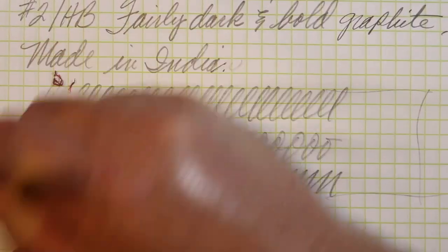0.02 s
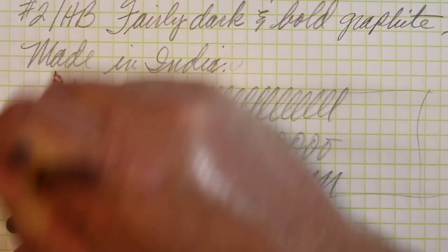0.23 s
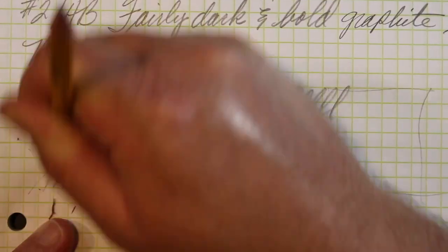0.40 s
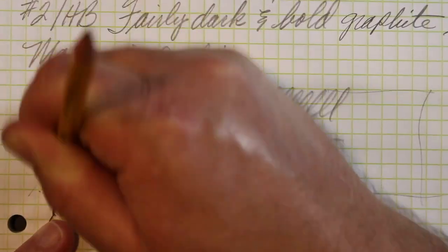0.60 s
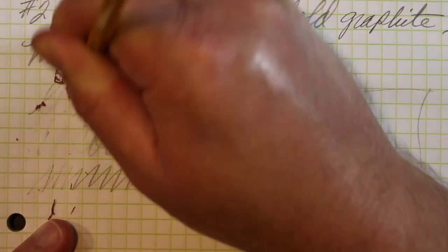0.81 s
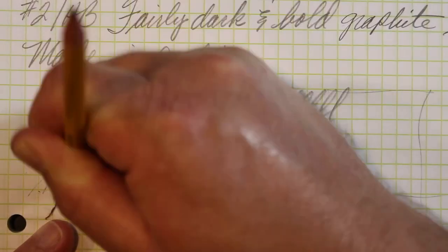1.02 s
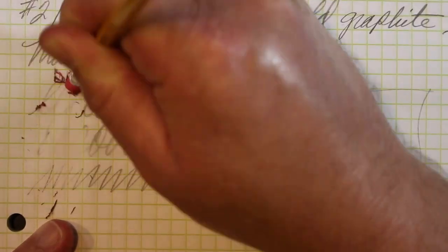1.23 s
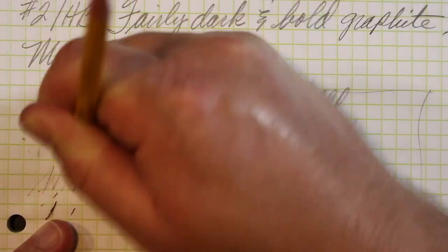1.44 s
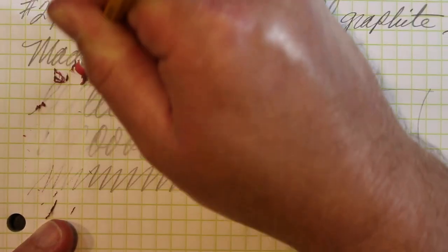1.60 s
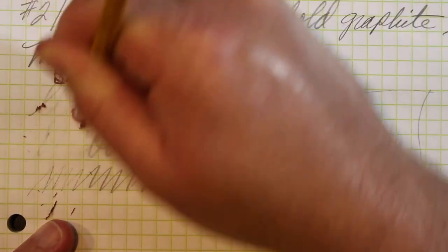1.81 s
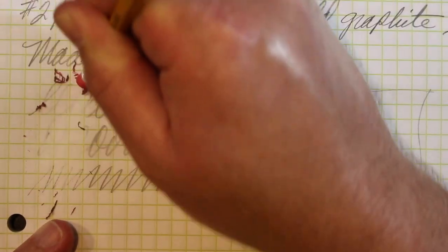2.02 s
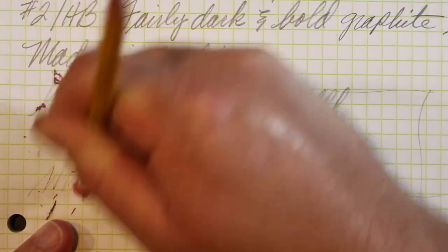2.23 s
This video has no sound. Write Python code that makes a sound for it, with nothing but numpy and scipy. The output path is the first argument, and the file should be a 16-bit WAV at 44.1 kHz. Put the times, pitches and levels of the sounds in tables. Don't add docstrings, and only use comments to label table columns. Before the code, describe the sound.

A rubber eraser on a pencil rubs paper on a wooden desk in short, dry, separate swipes; two hard bumps early rattle loose objects, then softer thumps and ticks follow. Close stereo microphone, quiet humming room.

```python
import sys
import numpy as np
from scipy import signal
from scipy.io import wavfile

SR = 44100
rng = np.random.default_rng(int(sys.argv[2]) if len(sys.argv) > 2 else 0)


def to_linear_factor(level_db):
    exponent = np.asarray(level_db, float) / 20
    return 10 ** exponent


def materialize(psi):
    bounded = np.clip(np.atleast_2d(psi).T, -1, 1)
    quanta = np.round(bounded * 32767).astype(np.int16)
    wavfile.write(sys.argv[1], SR, quanta)


N = 101430
T = np.arange(N) / SR

# pitch in Hz, likeness (1 = the same).
LIKENESS = [(60, 0.92), (250, 1), (700, 0.91), (2500, 0.8), (8000, 0.79), (15000, 0.62)]


def rms_one(x):
    return x / np.sqrt(np.mean(x ** 2) + 1e-20)


def at_hz(points, hz):
    table = np.array(points)
    return np.interp(np.log(hz), np.log(table[:, 0]), table[:, 1])


def filtered(x, order, hz, kind="low"):
    return signal.sosfilt(signal.butter(order, hz, kind, fs=SR, output="sos"), x)


def right_louder(db):
    return to_linear_factor(np.array([[-1], [1]]) * db)


def drift(rate):
    r = np.exp(-2 * np.pi * rate * 40 / SR)
    noise = rng.standard_normal(N // 40 + 2002)
    slow = signal.lfilter([1], [1, -2 * r, r * r], noise)[2000:]
    return np.interp(np.arange(N) / 40, np.arange(len(slow)), rms_one(slow))


def ring(x, hz, t60):
    r = to_linear_factor(-60 / (t60 * SR))
    w = 2 * np.pi * hz / SR
    return signal.lfilter([0, np.sin(w)], [1, -2 * r * np.cos(w), r * r], x + 1e-18)


def slips(rate, spread_db):
    sizes = to_linear_factor(spread_db * np.minimum(rng.exponential(1, (2, 2, N)), 5))
    sizes = sizes * rng.choice([-1, 1], (2, 2, N))
    happens = rng.random((2, 2, N)) < rate / SR
    return rms_one(sizes * happens)


def banded(white, spectrum, patchy_db, shape, likeness, rate=12):
    out, power = 0, 0
    edges = 20 * 2 ** np.arange(0, 10.1, 1 / 3)
    for k, (low, high) in enumerate(zip(edges, edges[1:])):
        hz = np.sqrt(low * high)
        if spectrum[0][0] / 1.3 < hz < spectrum[-1][0] * 1.3:
            mid, side = filtered(white[k % 2], 2, [low, high], "band")
            alike = np.clip(at_hz(likeness, hz), -1, 1)
            gain = to_linear_factor(at_hz(spectrum, hz))
            power += gain ** 2 * (high - low) * 2 / SR
            stereo = np.sqrt(1 + alike) * mid + np.sqrt(1 - alike) * side * [[1], [-1]]
            out = out + gain * to_linear_factor(patchy_db * drift(rate)) * shape(hz) * stereo / np.sqrt(2)
    return out / np.sqrt(power)


def chatter(s, length, count):
    x = np.zeros(N)
    draw = rng.random((count, 3))
    later = np.arange(count) > 0
    when = s + length * np.arange(count) / count + 0.001908 * draw[:, 0] * later
    weak = (0.056 + 0.15 * draw[:, 1]) * np.sign(draw[:, 2] - .5)
    x[np.clip((when * SR).astype(int), 0, N - 1)] = np.where(later, weak, 1)
    return x


def air():
    # pitch in Hz, level in dB per Hz.
    air_spectrum = [(12, -39), (20, -10.5), (214, -1.5), (441, -6.5), (535, -8.5), (3010, -15), (5110, -19),
                    (10800, -26), (15600, -33)]
    # pitch in Hz, likeness.
    air_likeness = [(40, 0.97), (250, 0.26), (1000, 0.067), (15000, 0.05)]
    white = rng.standard_normal((2, 2, N))
    return to_linear_factor(-52.5) * banded(white, air_spectrum, 1.2, lambda hz: 1, air_likeness)


def arm():
    # pitch in Hz, level in dB per Hz.
    arm_spectrum = [(30, -15), (60, -18), (110, -10), (170, -6)]
    white = rng.standard_normal((2, 2, N))
    return to_linear_factor(-68) * banded(white, arm_spectrum, 3.4, lambda hz: 1, LIKENESS, rate=3.5)


def room(x):
    t60_s, wall_cut_hz = 0.42, 5100
    out = np.zeros((2, N))
    dull = np.exp(-2 * np.pi * wall_cut_hz / SR)
    lags = (rng.uniform(.012, .035, 12) * SR).astype(int)
    for k, lag in enumerate(lags):
        loop, state = x.copy(), [0.]
        gain = to_linear_factor(-60 * lag / SR / t60_s)
        for i in range(lag, N, lag):
            back, state = signal.lfilter([gain * (1 - dull)], [1, -dull], loop[i - lag:i], zi=state)
            loop[i:i + lag] += back[:N - i]
        out[k % 2] += (loop - x) * (-1) ** (k // 2)
    return out


def ticks():
    # start in seconds, peak level in dB, pitch in Hz, time to fade by 60 dB in seconds.
    tick_list = [(.142, -40, 5600, 0.029), (.322, -37, 750, 0.036), (.332, -50, 2530, .06),
                 (.417, -48, 1780, 0.023), (.433, -29, 700, .018), (.711, -35, 1695, .015),
                 (.746, -27, 762, 0.0075), (.748, -54, 1378, 1), (.787, -40, 2260, .04),
                 (.788, -44, 1400, .025), (.989, -46, 1510, 0.029), (1.002, -36, 740, 0.037),
                 (1.173, -47, 990, 0.022), (1.192, -42.5, 1300, 0.035), (1.205, -50, 577, 0.24),
                 (1.417, -54, 660, 0.012), (1.462, -34, 600, 0.042), (1.558, -43.5, 1440, 0.012),
                 (1.582, -44, 3640, .02), (1.775, -42, 611, 0.038), (1.936, -48, 583, 0.14),
                 (2.143, -57, 520, 0.049), (2.169, -32, 650, 0.015), (2.228, -36.5, 486, 0.063)]
    out = np.zeros(N)
    for s, db, hz, t60 in tick_list:
        age = np.maximum(T - s, 0)
        main = np.sin(2 * np.pi * hz * age)
        above = 0.22 * np.exp(-age / 0.0063) * np.sin(2 * np.pi * 2.6 * hz * age)
        out += to_linear_factor(db - 60 * age / t60) * (main + above)
    return out * right_louder(.6)


def knocks():
    # start in seconds, level in dB, length of the chatter in seconds.
    knock_list = [(0.2347, -19.5, .022), (0.273, -40, 0.018), (.434, -43, .006), (0.5163, -24.5, 0.016),
                  (0.557, -42.5, 0.017), (0.712, -37, 0.018), (0.7476, -44.5, 0.0032),
                  (1.263, -41.5, 0.011), (1.289, -44, .006), (1.454, -34.5, 0.014), (2.171, -54, 0.0069)]
    # pitch in Hz, level in dB per Hz.
    crack_spectrum = [(290, -79), (500, -3), (1000, -7), (1600, -3), (2430, -9), (3440, -5), (3770, -14),
                      (12000, -6.5), (15600, -75), (22000, -120)]
    # pitch in Hz, level in dB, time to fade by 60 dB in seconds.
    object_tones = [(1210, -4, .09), (1380, -17, .4), (1565, 2.5, .06), (1604, -14, .3), (1777, -13, .7),
                    (1804, -21, .5), (1946, 0, .06), (2220, -9, .1), (2409, -1, .08), (2530, -10, .22),
                    (3200, -5.5, .085), (3495, -11, .08), (3718, -5, .07), (5290, -10, .05)]
    crack_db, crack_tail_s = -6, 0.0099
    rings_db, right_db, lag_s = -7.5, 5, 0.000073
    earlier_s, earlier_db = 0.019, -26
    hold, touches, rings = np.zeros(N), np.zeros(N), 0
    for s, db, length in knock_list:
        rise = np.clip((T - s) * 600, 0, 1)
        fade = np.exp(-np.maximum(T - s - 0.59 * length, 0) / (crack_tail_s + 0.27 * length))
        hold += to_linear_factor(db) * rise * fade
        touches += to_linear_factor(db) * chatter(s, length, count=6)
    crack = banded(slips(6000, 3.0), crack_spectrum, 1.5, lambda hz: hold, LIKENESS)
    for hz, db, t60 in object_tones:
        struck = np.roll(touches, rng.integers(0, 150))
        struck[0] = to_linear_factor(earlier_db - 60 * earlier_s / t60)
        tone = to_linear_factor(db) * ring(struck, hz, t60)
        late = np.interp(T - lag_s * rng.uniform(0.04, 1.7), T, tone)
        rings = rings + np.array([late, tone]) * right_louder(.5 * rng.normal(right_db, 2))
    return filtered(to_linear_factor(crack_db) * crack + to_linear_factor(rings_db) * rings, 4, 5200)


def thumps():
    # start in seconds, peak level in dB, pitch in Hz, length of contact in seconds.
    thump_list = [(.002, -32, 227, 0.007), (.2362, -12.5, 202, 0.008), (0.2375, -20, 359, 0.005),
                  (.259, -40, 346, 0.0092), (.29, -43, 230, 0.019), (.345, -41, 348, 0.012),
                  (0.399, -44.5, 350, .01), (.141, -43.5, 374, 0.0016), (0.437, -37, 240, 0.0064),
                  (0.5169, -19, 200, 0.014), (0.525, -29.5, 347, 0.0091), (0.561, -32, 352, 0.057),
                  (0.63, -33, 240, 0.0078), (0.712, -28, 241, 0.0084), (0.7469, -35.5, 304, 0.0029),
                  (1.259, -28, 253, 0.014), (1.289, -40.5, 260, 0.0044), (1.352, -44.5, 343, 0.0099),
                  (1.456, -31, 240, 0.014), (1.478, -37, 220, .012), (1.534, -47, 255, 0.015),
                  (1.65, -32, 222.6, 0.016), (1.776, -47, 190, 0.0058), (1.836, -31.5, 245, 0.012),
                  (1.939, -46.5, 536, 0.0071), (2.123, -42.5, 231, 0.0078), (2.168, -32, 532, 0.0033),
                  (2.21, -28, 241, 0.013), (2.268, -47.5, 223, 0.0086)]
    # pitch in Hz, level in dB, time to fade by 60 dB in seconds.
    desk_tones = [(132, -2, 0.056), (194, -35, 0.17), (241, -22, 0.19), (302, -11.5, 0.055),
                  (345.7, -4, 0.13), (365, -9, 0.21), (530, -4.5, 0.031), (651, -8, 0.049),
                  (758, -10, 0.13)]
    # pitch in Hz, level in dB per Hz.
    shudder_spectrum = [(70, 0.5), (130, -1), (220, 14), (350, 4.5), (700, -6.5), (1300, -9)]
    spot_t60_s, desk_db = 0.059, -9
    shudder_db, shudder_tail_s = -16.5, 0.032
    spot, touches, shake = np.zeros(N), np.zeros(N), np.zeros(N)
    for s, db, hz, length in thump_list:
        contact = (T > s) * (T < s + length)
        push = to_linear_factor(db) * np.sin(2 * np.pi * hz * (T - s)) * contact * 2 / (length * SR)
        spot += ring(push, hz, spot_t60_s)
        touches += to_linear_factor(db) * chatter(s, length, count=1)
        rise = np.sin(np.pi / 2 * np.clip((T - s) / 0.0035, 0, 1)) ** 2
        shake += to_linear_factor(db) * rise * np.exp(-np.maximum(T - s, 0) / shudder_tail_s)
    soft = filtered(touches, 2, 800)
    desk = sum(to_linear_factor(db) * ring(soft, hz, t60) for hz, db, t60 in desk_tones)
    body = filtered(spot + to_linear_factor(desk_db) * desk, 4, 138, "high")
    shudder = banded(slips(1300, 2.27), shudder_spectrum, 3.76, lambda hz: shake, LIKENESS)
    return body * right_louder(.3) + to_linear_factor(shudder_db) * shudder


def scuffs():
    # start in seconds, length in seconds, level in dB, pitch in Hz.
    scuff_list = [(0.135, 0.066, -46.5, 7700), (0.148, .055, -71, 5460), (0.274, 0.019, -40.5, 4570),
                  (0.428, 0.1, -55.5, 7500), (0.657, 0.027, -50.5, 5370), (0.743, 0.021, -50, 5300),
                  (2.153, 0.097, -51.5, 75), (0.306, 0.068, -55, 89), (1.584, .04, -52, 6500),
                  (1.775, .04, -55, 190), (1.045, 0.027, -52, 5000), (.79, .09, -62, 12500),
                  (1.0, .09, -63, 12500), (1.19, .09, -60, 12500), (1.575, .085, -61, 12500),
                  (.432, .06, -54, 5200), (1.78, .06, -58, 5200)]
    out = 0
    grit = slips(2400, 3.3)[0]
    for s, length, db, hz in scuff_list:
        mid, side = rms_one(filtered(grit, 2, [hz * .8, hz * 1.25], "band"))
        u = np.clip((T - s) / length, 0, 1)
        swell = np.sin(np.pi * u ** 0.53) ** 0.49 * (u < 1)
        out = out + to_linear_factor(db) * swell * (mid + 0.41 * side * np.array([[1], [-1]]))
    return out


def stroke_shape(hz, drag):
    # start in seconds, length in seconds, speed as hiss level in dB,
    # drag on the pad in dB above the hiss, place of the peak from 0 to 1.
    stroke_list = [(-.03, .1, -49, 2, 0.4), (0.128, 0.075, -45.5, -7.5, 0.48),
                   (0.259, 0.11, -51, 1.5, 0.28), (0.417, 0.095, -47.5, 4, 0.29), (0.631, 0.18, -58, 9, 0),
                   (0.761, 0.13, -46.5, -3.5, 0.58), (0.984, 0.13, -48.5, 1.5, 0.4),
                   (1.178, 0.12, -45.5, -7, 0.47), (1.417, 0.092, -48.5, 0.5, 0.38),
                   (1.551, 0.12, -46, -4.5, 0.57), (1.768, 0.098, -55, 6.5, 0.37),
                   (1.931, 0.059, -50.5, 1, 0.37), (2.136, 0.084, -51, 4.5, 0.59),
                   (2.205, 0.054, -51.5, 3, 0.26)]
    t = T[::32]
    out = np.zeros(len(t))
    power = max(0.26 + 0.32 * np.log2(hz / 1000), .1)
    for s, length, db, drag_db, skew in stroke_list:
        bend = np.log(.5) / np.log(np.clip(skew, .1, .9))
        u = np.clip((t - s) / length, 0, 1) ** bend
        speed = np.maximum(np.sin(np.pi * u), 0)
        out += to_linear_factor(db + drag * drag_db) * speed ** power * (u < 1)
    return np.interp(T, t, out)


def rubbing():
    # pitch in Hz, level in dB per Hz.
    hiss_spectrum = [(880, -23), (1500, -2.5), (2650, -5), (3220, 3), (3550, -7), (4910, -3), (5910, -2),
                     (8740, -1.5), (15600, -17)]
    # pitch in Hz, level in dB per Hz.
    drag_spectrum = [(35, -40), (60, 1.5), (158, -2.5), (302, -5), (569, -5), (2240, -7), (2970, -13),
                     (4000, -14.5), (5200, -42), (8800, -120)]
    # pitch in Hz, width in Hz, lift in dB.
    sheet_tones = [(600, 290, 5.5), (3620, 230, 7.5), (4890, 680, 7.5), (6600, 330, 2.5), (8800, 130, 5)]
    hiss = banded(slips(6000, 2), hiss_spectrum, 2.4,
                  lambda hz: stroke_shape(hz, drag=False), LIKENESS, rate=21)
    drag = banded(slips(2500, 3.3), drag_spectrum, 2.94,
                  lambda hz: stroke_shape(hz, drag=True), LIKENESS, rate=13.7)
    x = to_linear_factor(1.5) * hiss + to_linear_factor(-1) * drag
    for hz, width_hz, db in sheet_tones:
        b, a = signal.iirpeak(hz, hz / width_hz, fs=SR)
        x = x + (to_linear_factor(db) - 1) * signal.lfilter(b, a, x)
    return x


def scene():
    near = rubbing() + scuffs() + thumps() + knocks() + ticks()
    walls = filtered(room(near.mean(axis=0)), 2, 400, "high")
    return near + to_linear_factor(-17.5) * walls + arm() + air()


def low_pass(x):
    return signal.sosfilt(signal.butter(12, 15730, fs=SR, output="sos"), x)


def record(dry):
    steep = signal.ellip(12, .5, 90, 15700, fs=SR, output="sos")
    mix = signal.sosfilt(steep, dry)
    return low_pass(mix)


dry = scene()
out = record(dry)
materialize(out)
```